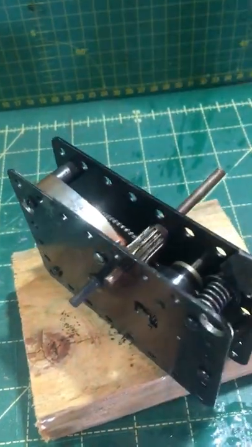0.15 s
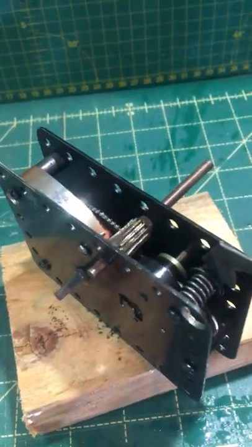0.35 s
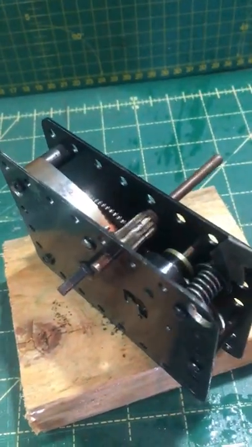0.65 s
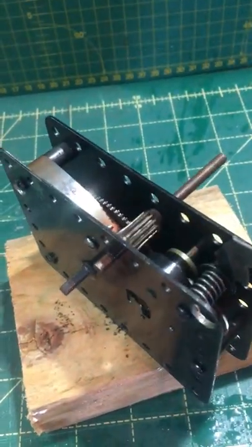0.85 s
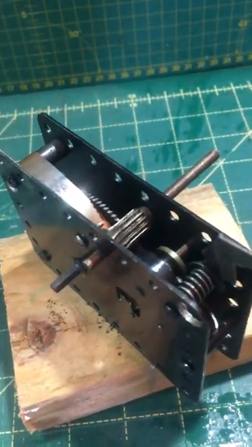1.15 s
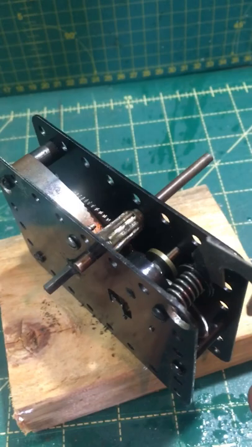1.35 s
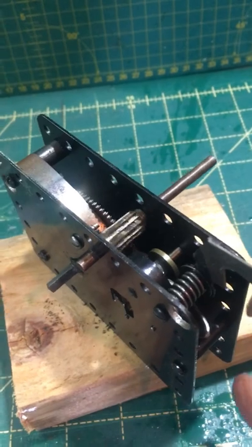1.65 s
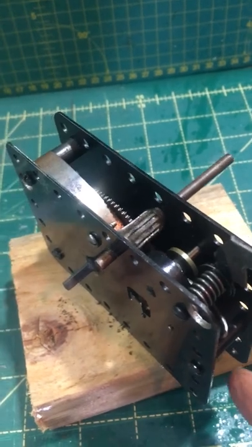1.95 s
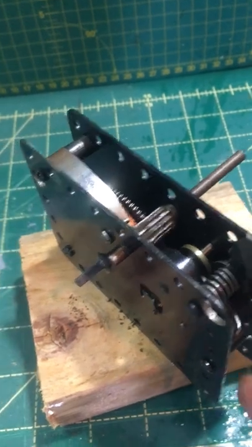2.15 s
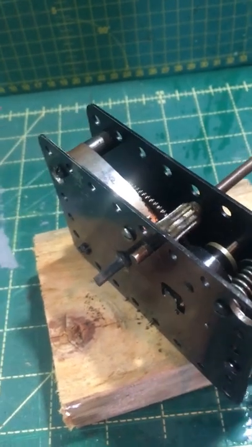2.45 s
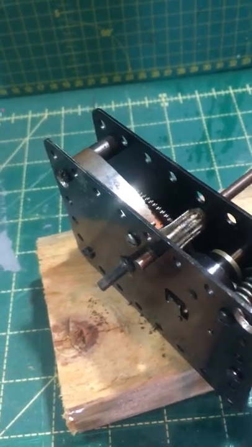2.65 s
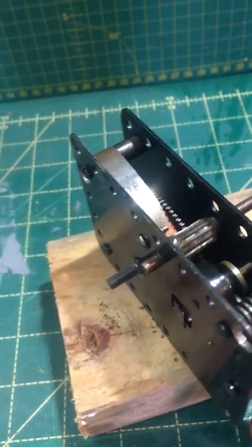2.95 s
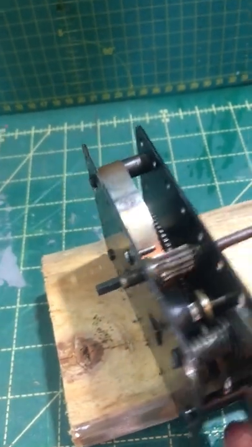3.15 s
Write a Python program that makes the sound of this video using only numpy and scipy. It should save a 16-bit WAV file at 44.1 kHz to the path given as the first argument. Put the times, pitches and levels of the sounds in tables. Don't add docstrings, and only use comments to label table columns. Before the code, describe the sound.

A wind-up clockwork motor is already whirring at 0 s and runs throughout to 3.3 s, bright, grainy and metallic with rapid flutter. Beneath it a low hum near 58 Hz sinks to about 53 Hz, weaker and wavering after 1 s. Dull block nudges fall near 0.3, 0.6, 0.7 and 2.7 s. Sharp ticks scatter throughout, densest 1.1-2.3 s, strongest near 1.4 s. Quiet room, close small microphone, faint hiss.

```python
import sys
import numpy as np
from scipy import signal
from scipy.fft import rfft, irfft, next_fast_len
from scipy.io import wavfile
from scipy.ndimage import uniform_filter1d, map_coordinates

SR = 44100
rng = np.random.default_rng(int(sys.argv[2]) if len(sys.argv) > 2 else 0)


def gain_from_decibels(decibels):
    exponent = np.asarray(decibels, float) / 20
    return 10 ** exponent


def unload_audio(sound):
    columns = np.transpose(np.atleast_2d(sound))
    steps = np.round(np.clip(columns, -1, 1) * 32767)
    wavfile.write(sys.argv[1], SR, steps.astype(np.int16))


N = 145971

WHEEL_RATIO, WHEEL_ANGLE = .178, 2.55
TICK_SPREAD_DB = 1.9

# t/s, wood ringing level/dB, brightness (half the lift above 1050 Hz)/dB,
# handling rumble level/dB
GRIP = [(0, 1, -3.5, -47), (.5, 2, -2.5, -56), (.95, 2, -3, -44), (1.1, -1, 2, -72), (1.5, 0, 0.5, -74),
        (1.8, 2, 2, -70), (2.2, 1.5, 0.5, -75), (2.7, -2, 2.5, -72), (2.95, -3, 3, -74), (3.31, -5, 3, -81)]


def unit(x):
    return x / np.sqrt(np.mean(x ** 2) + 1e-20)


def curves(rows):
    s, *cols = np.transpose(rows)
    return [np.interp(np.arange(N) / SR, s, c) for c in cols]


def wobble(rate):
    return map_coordinates(rng.standard_normal(400), [np.arange(N) * rate / SR])


def flutter(rate):
    fast = wobble(rate)
    return fast - uniform_filter1d(fast, size=SR // 10)


def filtered(x, response):
    m = next_fast_len(N + SR // 2)
    return irfft(rfft(x, m) * response(np.fft.rfftfreq(m, 1 / SR)), m)[:N]


def ringing(x, modes):
    def response(f):
        total = 0
        for k, (centre, width, db) in enumerate(modes):
            damping = 1j * f * width
            total = total + (-1) ** k * gain_from_decibels(db) * damping / (centre ** 2 - f ** 2 + damping)
        return total
    return filtered(x, response)


def narrow_noise(hz, width):
    mode = [(hz, width, 0)]
    return unit(ringing(ringing(rng.standard_normal(N), mode), mode))


def struck(t, hz, db, t60, attack):
    return gain_from_decibels(db - 60 * t / t60) * (1 - np.exp(-t / attack)) * np.sin(2 * np.pi * hz * t)


def shaft():
    # t/s, speed/(turns per s)
    speed = [(0, 58.21), (.85, 56.81), (1.05, 56.25), (2, 54.73), (2.9, 53), (3.31, 52.9)]
    start_turn = -.065
    return 2 * np.pi * (np.cumsum(curves(speed)[0]) / SR + start_turn)


def hum():
    # t/s, hum level/dB, loose-foot chatter/dB, second multiple/dB, fifth multiple/dB
    hum_levels = [(0.0, -32.5, -17, -2, -7), (0.14, -30.5, -35, -6.5, 0.5), (1.0, -32.5, -12.5, -0.5, -5),
                  (1.04, -37, -12, 4.5, -14), (1.28, -35.5, -23, -1, -3.5), (1.33, -39, -19, 2, 2),
                  (2.17, -37.5, -26, 3, 3.5), (2.19, -42.5, -23, 5, -4), (2.29, -35, -27, 0, -4),
                  (2.35, -45.5, -22, 7, -4), (2.39, -37.5, -36, 4, -3), (2.79, -42.5, -33, 1.5, -3),
                  (2.85, -38.5, -33, -3, 1), (3.0, -45.5, -44, -12, -5), (3.23, -39, -38, -3, -1.5),
                  (3.31, -41, -25, 4, -11)]
    # t/s, lag of the hum/turns
    seat = [(0, 0), (1.03, -.09), (1.05, .16), (2, .13), (2.93, .1), (3.04, .3), (3.31, .05)]
    # multiple of the shaft, level/dB, unsteadiness/dB, follows hum level (0-1)
    orders = [(1, 1.5, -0.06, 0.84), (1.178, -19, 1, 0.3), (2, -13, 0.5, 1), (3, -25.5, 3, 0.4),
              (4, -35.5, 3, 0), (5, -25, 1.4, 0.13), (6, -36, 1.5, 0.4), (8, -31, 0.5, 0.67),
              (9, -29.5, 2, 0.3), (13, -36, 3, 0.5), (16, -33.5, 0.5, 0.94), (17, -37.5, 3.5, 0.5)]
    level_db, foot_db, second_db, fifth_db = curves(hum_levels)
    mean_db = level_db.mean()
    angle = shaft() - 2 * np.pi * curves(seat)[0]

    tones = np.zeros(N)
    for k, db, unsteady_db, follow in orders:
        tone_db = db + unsteady_db * wobble(12) + follow * (level_db - mean_db)
        tone_db = tone_db + (k == 2) * second_db + (k == 5) * fifth_db
        phase = k * angle + 0.32 * (k > 1) * wobble(6.48)
        tones += gain_from_decibels(tone_db) * np.cos(phase)

    foot_order, foot_rough_rad = 2.47, 0.35
    foot_phase = foot_order * shaft() + foot_rough_rad * wobble(14)
    foot = gain_from_decibels(level_db + foot_db + 0.91 * wobble(14.8)) * np.cos(foot_phase)

    handling = narrow_noise(hz=41, width=15) + gain_from_decibels(-2.5) * narrow_noise(hz=83, width=20)
    rumble = gain_from_decibels(curves(GRIP)[2]) * handling
    table = gain_from_decibels(-56) * narrow_noise(hz=62.9, width=10)
    return np.sqrt(2) * gain_from_decibels(mean_db) * tones + foot + rumble + table


def teeth(angle):
    teeth_per_turn, first_tooth_turn = 8, -.015
    sway_turn, drift_turn, scatter = .018, .012, .05
    sway = sway_turn * np.cos(WHEEL_RATIO * angle + WHEEL_ANGLE)
    turns = angle / (2 * np.pi) + sway + drift_turn * wobble(6)
    whole = np.flatnonzero(np.diff(np.floor((turns - first_tooth_turn) * teeth_per_turn))) + 1
    draw = rng.standard_normal((2000, 2))[:len(whole)]
    at = whole + draw[:, 0] * scatter * np.mean(np.diff(whole))
    at = np.clip(at, 0, N - 1).astype(int)
    return np.bincount(at, gain_from_decibels(TICK_SPREAD_DB * draw[:, 1]), N)


def stray_taps():
    return (rng.random(N) < 500 / SR) * gain_from_decibels(TICK_SPREAD_DB * rng.standard_normal(N) - 5)


def gears():
    # t/s, tooth load level/dB, spindle ring level/dB
    load = [(0.0, -42, -49), (0.05, -43.5, -47), (0.58, -45, -45.5), (0.8, -47, -46), (0.85, -45.5, -46),
            (0.89, -47, -44), (0.92, -44, -45.5), (1.66, -37, -47), (1.7, -39.5, -52), (1.88, -45.5, -48),
            (1.94, -42, -48.5), (2.4, -40, -45), (2.45, -39.5, -55), (2.56, -41, -44), (3.05, -47, -44),
            (3.11, -45.5, -43), (3.26, -48.5, -58), (3.31, -46, -40)]
    # t/s, pivot level/dB, wheels level/dB, pinions level/dB
    aim = [(0, 0.5, 0, 0.5), (.5, -1, 1, -0.5), (.8, 2.5, 0, 0.5), (1.4, 0, 1, 0), (1.9, 1.5, 0.5, 0.5),
           (2.3, -1, -0.5, 0), (2.45, -4, 1, -0.5), (2.7, -0.5, -1, 0), (3.31, -4, -3, 0)]
    # t/s, near plate level/dB, far plate level/dB, thin rings level/dB
    flex = [(0, -1.5, 2, 1.5), (.3, -1, 3, 4), (.55, -0.5, 3.5, 2), (.63, -2, 1, 2), (.9, 1, 0, -2),
            (.95, 0.5, 3.5, 1), (1.3, 0, 0, 4), (1.66, -1, 1, 0.5), (1.71, -0.5, -5, -5), (1.9, 3, -2.5, 0),
            (2.1, -0.5, 0.5, 2), (2.4, -0.5, -0.5, -3.5), (2.66, 0.5, 0.5, 4.5), (2.75, -0.5, 1, -7),
            (3, 0, -1, 0), (3.31, 0, 0, 6.5)]
    # f/Hz, width/Hz, level/dB
    block = [(258, 58, 2), (420, 210, -1.5), (518, 59, 5), (724, 153, 1.5), (945, 170, 1.5), (1328, 144, 1),
             (1780, 60, -13)]
    # f/Hz, width/Hz, level/dB
    near_plate = [(2103, 210, -3.5), (2301, 68, 1.5), (2785, 290, -2.5)]
    far_plate = [(3110, 143, 2), (3550, 177, 2), (3970, 150, -2)]
    plate_rings = [(2367, 35, 1), (2484, 35, -5), (2821, 45, -1)]
    # f/Hz, width/Hz,
    # level/dB
    pivot = [(4390, 240, 0)]
    wheels = [(5080, 360, -5), (5620, 270, -5.5), (5995, 285, 0), (6215, 180, 1.5), (6566, 200, 0.5),
              (7316, 270, -1)]
    pinions = [(8220, 1500, -8), (8650, 190, 2.5), (8930, 390, -1.5), (9730, 380, 3.5), (9891, 330, 0.5)]
    arbor = [(11250, 1100, 0.5), (11900, 650, 1.5), (13000, 1500, -6)]
    collar = [(14900, 660, 0), (15400, 810, -2)]
    spindle = [(13530, 120, -4), (13650, 70, 0), (13770, 110, -9)]
    # level/dB, share of taps (0-1), teeth over stray taps/dB, wander of its pitch (0-1)
    mix = [
        (-54.5, 0.26, -10, 0),
        (-48.5, 0.32, -14, .01),
        (-46.5, 0.24, -4, .01),
        (-53.5, 0.52, -2, 0),
        (-46.5, 0.37, -4, 0),
        (-40.5, .4, -12, 0.02),
        (-39, 0.48, 6, 0),
        (-38, 0.53, -5, 0),
        (-53, .4, 4, .002),
        (-40.5, 0, -10, 0),
    ]
    swells = [(.5, .5, .1, .9, 0, 0, 0, 0), (.42, -1.4, .07, -1.8, .1, -3, .07, .8),
              (.48, -2.2, .34, 1, .07, -1.7, 0, 0), (.3, -1.4, 0, 0, 0, 0, 0, 0),
              (.88, -2.9, .47, 1, .14, -1.8, .1, 1.9), (.07, -2.5, .38, 1.7, .1, -.4, 0, 0),
              (.45, -1.2, .22, 2, .18, -1.5, .21, 2.9), (.1, -.1, .4, 2.6, .13, -1.2, 0, 0),
              (.6, -2.2, .27, 2.4, .2, -.4, .1, -2.8), (0, 0, .5, -2, .1, -2.3, .07, 2.1)]
    # follows load (0-1), feels the slow wheel (factor), patchiness/dB
    feels = [(.2, .1, .8), (.8, .8, .7), (.6, 1.1, .7), (1, 1, 2.5), (.1, 1.1, 1), (.15, 1.1, .5),
             (.05, .8, .3), (.05, .75, .3), (.05, 1.1, .4), (0, .9, 1)]

    angle = shaft()
    load_db, ring_db = curves(load)
    wood_db, bright_db, _ = curves(GRIP)
    pivot_db, wheels_db, pinions_db = curves(aim)
    near_db, far_db, rings_db = curves(flex)
    load_swing, ring_swing = load_db - load_db.mean(), ring_db - ring_db.mean()
    bodies = block, near_plate, far_plate, plate_rings, pivot, wheels, pinions, arbor, collar, spindle
    facing_db = (wood_db, near_db, far_db, rings_db, pivot_db, wheels_db, pinions_db, pinions_db, 0,
                 ring_swing)

    mesh, shared = teeth(angle), stray_taps()
    common = gain_from_decibels(.3 * flutter(39.68))
    tick = gain_from_decibels(-60 * np.arange(200) / SR / .0022)
    wheel_swell = .26 * np.cos(WHEEL_RATIO * angle + WHEEL_ANGLE)

    out = np.zeros(N)
    for modes, own_db, body, body_swells, body_feels in zip(bodies, facing_db, mix, swells, feels):
        db, share, tooth_db, wander = body
        follow, wheel_feel, patch_db = body_feels
        burst = np.convolve(gain_from_decibels(tooth_db) * mesh + shared + stray_taps(), tick)[:N]
        impacts = unit(burst * rng.standard_normal(N))
        friction = rng.standard_normal(N)
        drive = np.sqrt(share) * impacts + np.sqrt(1 - share) * friction
        sound = ringing(drive * gain_from_decibels(patch_db * flutter(25.08)) * common, modes)

        position = np.arange(N) + np.cumsum(wander * flutter(30))
        sound = map_coordinates(sound, [position], order=3, mode="nearest")

        swell = np.ones(N)
        for k, (depth, turn) in enumerate(np.reshape(body_swells, (4, 2)), start=1):
            swell += depth * np.cos(k * angle + turn)
        swell = np.clip(swell, .05, 3) * (1 + wheel_feel * wheel_swell)
        sound = unit(sound * np.sqrt(swell))

        if modes is block:
            dull = filtered(sound, lambda hz: 1 / (1 + (hz / 1050) ** 8))
            sound = dull + gain_from_decibels(2 * bright_db) * (sound - dull)
        out += gain_from_decibels(db + own_db + follow * load_swing) * sound
    return out


def knocks():
    # t/s, peak level/dB, f/Hz
    train_knocks = [(0.0393, -28, 6960), (0.1256, -25, 6060), (0.1955, -21, 3270), (0.387, -26, 4390),
                    (0.4199, -28, 7260), (0.4384, -23, 7220), (0.9278, -24, 7250), (1.1174, -21, 6290),
                    (1.2301, -22, 7380), (1.3184, -26, 7370), (1.3673, -24, 6140), (1.419, -17, 6900),
                    (1.4616, -22, 7250), (1.5339, -26, 6630), (1.6611, -22, 6070), (1.7335, -23, 7300),
                    (1.8253, -25, 4440), (1.8512, -22, 6740), (1.9265, -21, 6440), (2.0433, -29, 4420),
                    (2.0622, -21, 3600), (2.1545, -26, 7270), (2.2283, -27, 6050), (2.2463, -27, 6160),
                    (2.3401, -26, 6050), (2.7601, -25, 6280),
                    (2.5207, -25, 2360),
        (2.5795, -34, 2810),
        (2.6678, -31, 3090),
    ]
    out, t = np.zeros(N + SR), np.arange(SR // 40) / SR
    for s, db, hz in train_knocks:
        out[round(s * SR):][:len(t)] += struck(t, hz, db - 5, t60=0.018, attack=0.00043)
    return out[:N]


def nudges():
    # t/s, peak level/dB, f/Hz, t60/s
    pushes = [
        (.01, -47, 117, 0.085),
        (.29, -27, 117, .1),
        (.61, -26, 137, 0.081),
        (.73, -33, 150, 0.078),
        (2.666, -29.5, 130, 0.051),
        (2.96, -45, 159, 0.42),
    ]
    out, t = np.zeros(N + SR), np.arange(SR // 2) / SR
    for s, db, hz, t60 in pushes:
        out[round(s * SR):][:len(t)] += struck(t, hz, db, t60, attack=0.009)
    return out[:N]


def room():
    # f/Hz, level/dB per Hz
    air_spectrum = [(15, -34), (25, -22), (65, -40), (97, 7), (479, -30), (1310, -17), (1550, -29.5),
                    (2000, -6), (2600, -65), (4400, -120)]
    f, db = np.transpose(air_spectrum)
    air = filtered(rng.standard_normal(N), lambda hz: gain_from_decibels(np.interp(np.log(hz + 1), np.log(f + 1), db)))
    hiss = filtered(rng.standard_normal(N), lambda hz: hz ** 2 / (hz ** 2 + 2200.0 ** 2))
    return gain_from_decibels(-55) * unit(air) + gain_from_decibels(-50) * unit(hiss)


def scene():
    return (hum() + gears() + knocks() + nudges() + room())[None]


def band_limit(x):
    return signal.sosfilt(signal.butter(12, 15700, fs=SR, output="sos"), x)


def record(dry):
    return band_limit(dry)


dry = scene()
out = record(dry)
unload_audio(out)
```